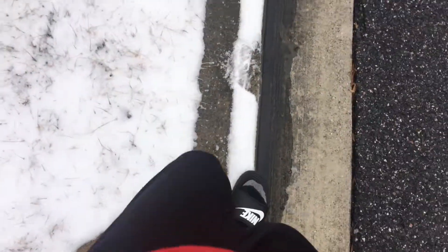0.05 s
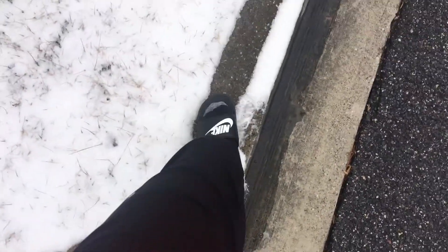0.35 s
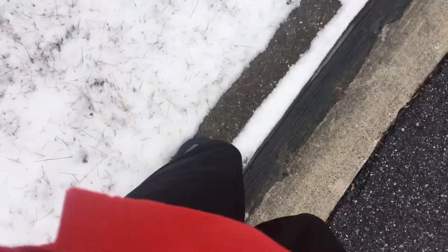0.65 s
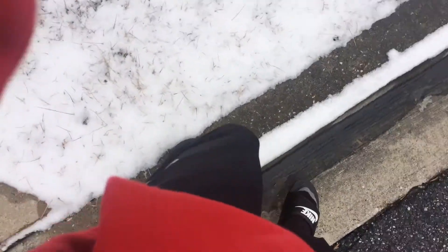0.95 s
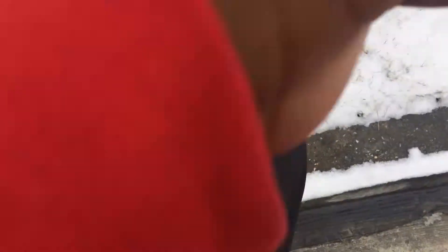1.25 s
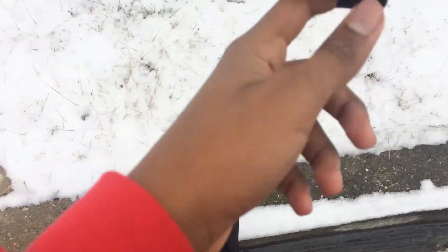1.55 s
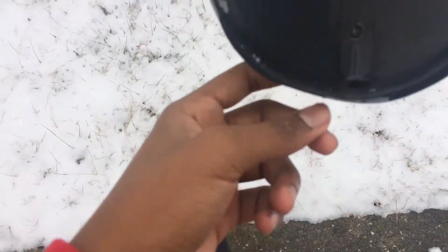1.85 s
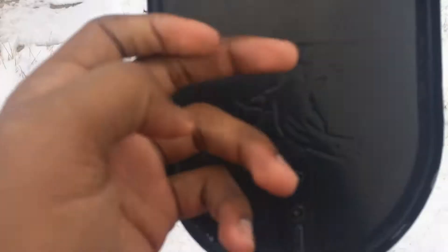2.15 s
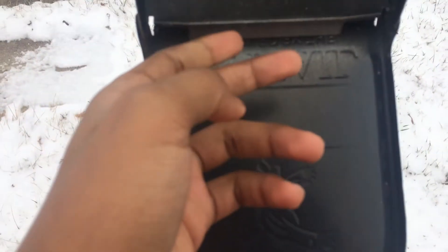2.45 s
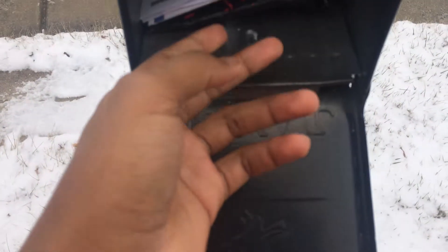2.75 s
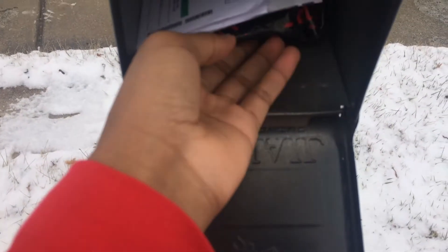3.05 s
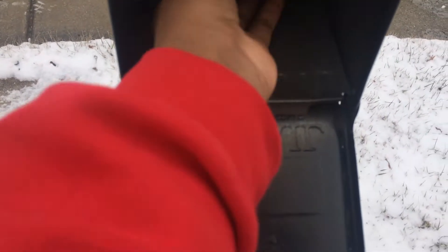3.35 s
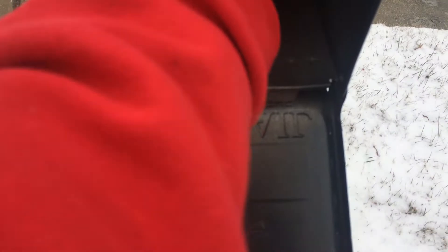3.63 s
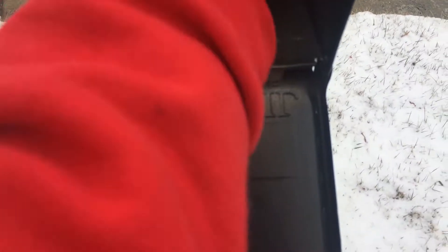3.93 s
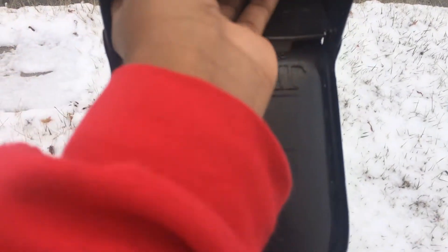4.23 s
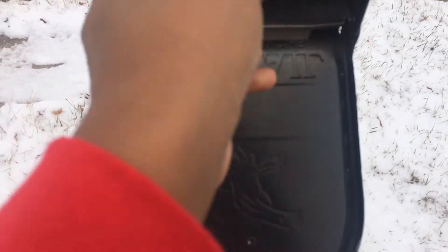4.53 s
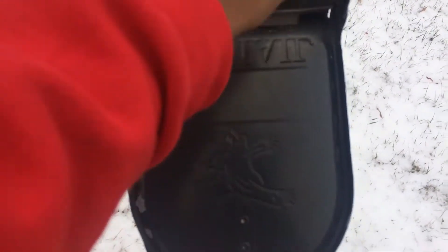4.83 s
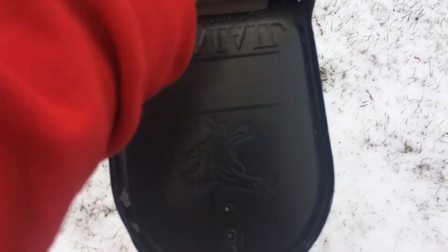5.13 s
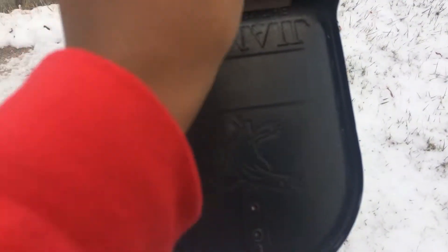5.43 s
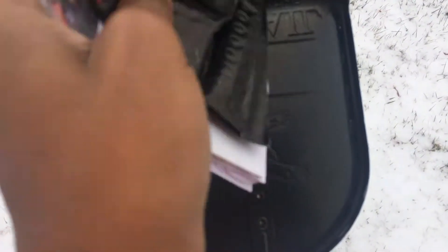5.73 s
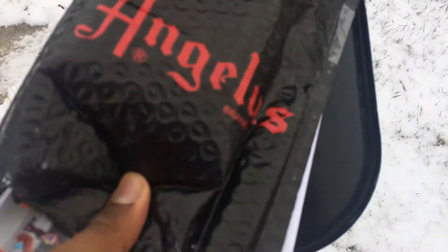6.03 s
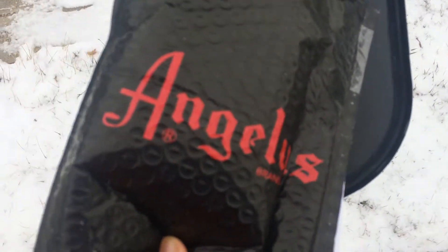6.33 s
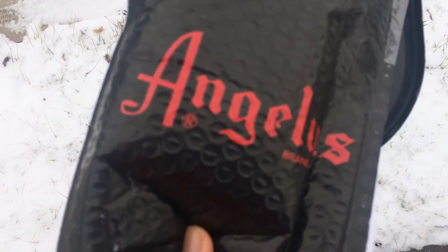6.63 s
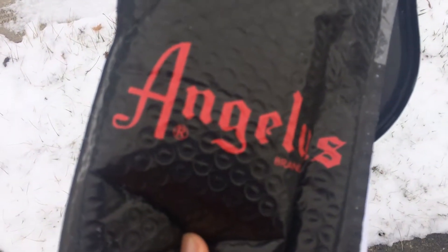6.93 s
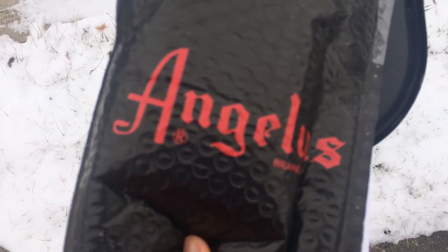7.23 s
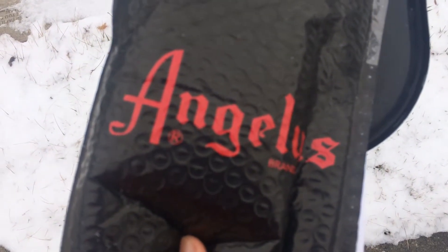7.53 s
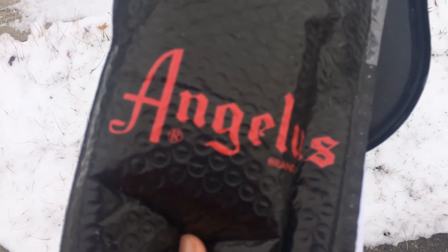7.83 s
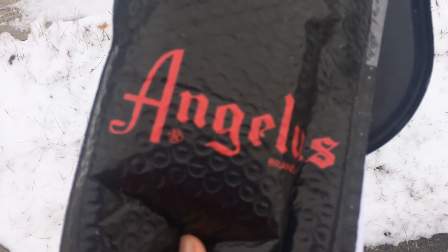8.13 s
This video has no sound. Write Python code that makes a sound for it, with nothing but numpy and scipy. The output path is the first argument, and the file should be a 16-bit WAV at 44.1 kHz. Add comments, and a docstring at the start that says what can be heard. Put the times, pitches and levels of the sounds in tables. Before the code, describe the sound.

Wind rumbles on the microphone as a plastic mailbox knocks and scrapes open, then a hand rummages and pulls out a crinkling mailer.

```python
"""At a plastic mailbox on a snowy curb, wind rumbles on a hand-held phone and two steps scuff up.
The box knocks and its door scrapes open. A hand rummages in short strokes, drags the mail over the
floor of the box with a thump, and pulls out a padded plastic mailer that crinkles ever less in the grip.
Scrapes and rustles are stick-slip friction, knocks are damped modes, snaps are bursts of noise.
Faint bird-like calls sound far off at the end."""
import sys
import numpy as np
from scipy import signal
from scipy.fft import rfft, irfft, next_fast_len
from scipy.io import wavfile
from scipy.ndimage import uniform_filter1d, map_coordinates

SR = 44100
rng = np.random.default_rng(int(sys.argv[2]) if len(sys.argv) > 2 else 0)


def bounce(signal):
    """Save signal as a 16-bit WAV file at the path given by the first command-line argument."""
    frames = np.transpose(np.atleast_2d(signal))
    limited = np.clip(frames, -1, 1)
    pcm = np.round(limited * 32767).astype(np.int16)
    wavfile.write(sys.argv[1], SR, pcm)


N = 365148


# hand strokes among the mail: t/s, length/s, film level/dB, wall level/dB, release t60/s
HAND_STROKES = [(3.008, 0.058, -46.5, -44, 0.26), (3.083, 0.074, -41, -49, 0.32),
                (3.171, 0.087, -41.5, -39, .25), (3.25, 0.076, -37, -36.5, 0.13),
                (3.344, 0.094, -40, -35.5, 0.24), (3.45, 0.2, -42.5, -55, 0.28),
                (3.657, 0.22, -45, -47.5, 0.33), (3.852, 0.17, -41, -40.5, .35),
                (3.995, 0.17, -33, -37.5, 0.45), (4.185, 0.03, -40, -62, .2),
                (4.252, 0.045, -35, -37.5, 0.21), (4.327, 0.076, -45, -45, .15),
                (4.409, 0.11, -39, -43.5, 0.17), (4.511, 0.035, -37.5, -39, 0.06),
                (4.547, 0.057, -52.5, -59, 0.36), (4.786, 0.064, -39.5, -44, 0.15),
                (4.845, 0.088, -37, -42.5, .2), (4.921, 0.12, -35, -42, 0.3),
                (5.043, 0.092, -36.5, -41.5, 0.22), (5.138, 0.053, -34, -36, 0.32),
                (5.218, 0.11, -37, -37, 0.31), (5.307, .11, -33, -41, 0.32),
                (5.435, 0.096, -37.5, -42, 0.16), (5.538, 0.17, -40.5, -50, .3),
                (5.676, 0.12, -36.5, -42.5, 0.49), (5.732, 0.053, -30, -35, 0.1),
                (5.861, 0.033, -37.5, -38.5, 0.2), (5.918, 0.018, -49, -42, 0.23),
                (5.97, 0.06, -45, -49, 0.19)]
# EQ of sliding film: f/Hz, level/dB
FILM_EQ = [(1060, -14), (1800, -5.5), (2190, -3.5), (2530, -8), (3030, -3), (3300, -2.5), (3800, -2),
           (5100, 1.5), (6900, 2), (10500, -15), (14400, -39), (15500, -95)]
# hollow of the box: f/Hz, width/Hz, level/dB
BOX_RESONANCES = [(826, 135, 6), (1017, 110, 4), (1210, 220, 0.5), (1453, 130, 2), (1670, 120, -4),
                  (1950, 280, -0.5), (2270, 310, -6.5), (3120, 910, -10.5)]

def rummage():
    """Plastic film slides, crackles and crinkles; where it rubs the walls, the box resonates."""
    releases = [row[-1] for row in HAND_STROKES]
    film_gain = strokes(HAND_STROKES, attack=.017, t60=releases)
    wall_gain = strokes(HAND_STROKES, attack=.017, t60=releases, column=1)
    crackle = slips(rate=4500, spread_db=3.6, clump_db=1.8, clump_rate=130)
    sliding = film_gain * unit(coloured(crackle, FILM_EQ))
    rub = crackle + slips(rate=1200, spread_db=2.5, clump_db=2, clump_rate=46)
    wall_eq = [(200, -44), (620, 7), (850, 14), (3000, 9.5), (7000, -3)]
    hollow = wall_gain * unit(coloured(resonate(rub, BOX_RESONANCES), wall_eq))
    rustle = shifting_folds(sliding + hollow + crinkles(), depth_db=1.9)
    return reflections(rustle, wet_db=-11.5, spread_s=.008)


# crinkle tails: t/s, length/s, level/dB
SETTLING = [(5.95, 0.4, -55.5), (6.5, 0.15, -60.5)]
# the mailer's creases, large to small: f/Hz, width/Hz, level/dB
CREASES = [(2230, 1200, 1), (4400, 1700, -3), (5600, 1000, -3), (6750, 800, -3), (9000, 2200, -8)]

def crinkles():
    """The mailer relaxes in the grip: creases of several sizes tick finely, each on its own."""
    ticks = sum(resonate(slips(rate=150, spread_db=3.2, clump_db=2.2, clump_rate=45), [crease])
                for crease in CREASES)
    ticks = coloured(ticks, [(600, -13), (1500, 0), (8000, 0), (11000, -14), (15000, -20)])
    return strokes(SETTLING, attack=.017, t60=.72) * unit(ticks)


# sharp plastic snaps: t/s, peak level/dB, t60/s, ring f/Hz
SNAPS = [(0.4863, -40, 0.028, 6240), (1.3503, -11.5, 0.024, 5870), (1.3536, -10.5, 0.043, 9100),
         (1.359, -16.5, 0.071, 6200), (1.507, -24, .02, 5800), (1.759, -12, 0.026, 7000),
         (3.013, -26, 0.022, 3240), (3.127, -22, .03, 4180), (3.486, -16.5, 0.017, 6200),
         (3.8485, -19.5, 0.026, 4760), (4.3297, -24, 0.033, 4800), (4.403, -12, 0.034, 4850),
         (4.448, -35, .02, 5000), (4.499, -23, 0.033, 5260), (4.532, -29, .025, 4000),
         (4.796, -22.5, 0.042, 5540), (4.8403, -14, 0.032, 5400), (4.8435, -8.5, 0.018, 5640),
         (4.852, -19, 0.039, 5600), (4.93, -24, .025, 6060), (4.944, -23, .02, 6200),
         (4.965, -32, .03, 6500), (5.038, -25, .02, 4960), (5.126, -27, .02, 3200),
         (5.147, -25, 0.025, 3800), (5.171, -23, 0.027, 4500), (5.192, -23, .02, 5000),
         (5.354, -20, 0.13, 3900), (5.414, -29, .02, 6000), (5.522, -26, 0.039, 5050),
         (5.557, -37, .02, 6000), (5.699, -23, .02, 6000), (5.766, -21, 0.046, 5500),
         (5.982, -27.5, 0.04, 8100), (6.13, -37, .03, 7070), (6.212, -36, .03, 7200),
         (6.2415, -46, .02, 5040), (6.2617, -37, 0.04, 5100), (6.2814, -38, .015, 3340),
         (6.294, -28.5, 0.022, 5900), (6.3437, -36, .02, 6870), (6.3622, -43, .02, 7130),
         (6.3906, -45, .025, 5350), (6.4295, -45, .02, 4600), (6.447, -43, .02, 4220),
         (6.464, -49, .02, 4800), (6.503, -46, .02, 5500), (6.507, -38, 0.02, 5490),
         (6.518, -35, 0.022, 8200), (6.53, -39, .02, 6440), (6.5572, -42, .02, 5020),
         (6.578, -37, 0.04, 7390), (6.586, -39, .03, 5200), (6.622, -37, 0.03, 5120),
         (6.6467, -41, 0.033, 5930), (6.66, -40, .02, 6200), (6.693, -45, .02, 2760),
         (6.709, -44, .02, 4900), (6.743, -46, .015, 5600), (6.753, -40.5, .022, 4490),
         (6.775, -39.5, 0.031, 5140), (6.8206, -50, .015, 5200), (6.867, -38.5, .028, 6600),
         (6.914, -48, .02, 5800), (6.934, -46, .02, 4800), (6.9514, -48, .015, 5000),
         (7.0244, -51, .02, 5500), (7.2504, -41.5, 0.02, 6400), (7.382, -52, .02, 5500),
         (7.996, -50.5, .02, 6000), (8.208, -48, 0.022, 5600)]
# their bright EQ: f/Hz, level/dB
SNAP_EQ = [(300, -26), (900, 1.5), (2200, -5), (4000, 1.5), (6300, 6.5), (8500, -0.5), (11000, -11.5),
           (15500, -26)]

def snaps():
    """Plastic snaps: the door's latch clicks, then the mailer's creases pop."""
    out = np.zeros(N)
    for s, db, t60, hz in SNAPS:
        pop = burst(t60, SNAP_EQ, crack_db=-1, crack_t60=.007)
        broad = np.interp(db, [-40, -14], [.6, 1.4])  # hard snaps are broad, small ticks more pitched
        pop = broad * pop + resonate(pop, [(hz, 1400, 1)])
        add(out, s, amp(db) * pop / np.abs(pop).max())
    return out


# flaps of the mail: t/s, peak level/dB, t60/s
FLAPS = [(3.778, -28, 0.04), (4.276, -22, 0.048), (4.289, -22, 0.06), (4.331, -20, 0.079),
         (4.402, -16, 0.098), (4.839, -22, .054), (4.931, -20, 0.038), (4.994, -20, 0.021),
         (5.168, -17, 0.055), (5.231, -28, 0.019), (5.877, -20, 0.11), (6.019, -25.5, 0.097),
         (6.062, -28, 0.02), (6.174, -29, 0.13), (6.226, -31.5, 0.025), (6.574, -34.5, 0.052)]
# their hollow EQ: f/Hz, level/dB
FLAP_EQ = [(200, -7), (650, -2), (980, 7), (1500, 2), (2000, 7), (2450, -3.5), (3000, -0.5), (4200, -11),
           (8000, -31), (15000, -56)]

def flaps():
    """The padded sheet and the letters flip over the rim of the box."""
    out = np.zeros(N)
    for s, db, t60 in FLAPS:
        crack_db = np.interp(db, [-22, -10], [2, 11])  # harder flaps crack more sharply
        add(out, s, amp(db) * burst(t60, FLAP_EQ, crack_db, crack_t60=.006))
    return out


# pulls over the floor of the box: t/s, length/s, level/dB
PULLS = [(3.67, 0.11, -50), (3.845, .04, -36.5), (3.882, 0.056, -26.5), (3.935, 0.062, -27),
         (3.972, 0.15, -24)]
# their tone deep in the box and at its mouth: f/Hz, width/Hz, level/dB
DEEP_RESONANCES = [(1072, 75, 7.5), (1300, 67, -2), (1900, 360, -13)]
MOUTH_RESONANCES = [(1020, 93, -2), (1470, 150, 5.5), (1840, 330, -5), (3150, 140, -12), (4070, 520, -11),
                    (5050, 450, -19)]
# catches before the slide: t/s, level/dB
CATCHES = [(3.603, -33), (3.688, -26), (3.712, -35), (3.733, -31), (3.754, -34), (3.778, -22), (3.797, -30)]
# the back of the box answers each: f/Hz, level/dB, t60/s
CATCH_MODES = [(1080, 0, 0.03), (1230, -12, .03), (1950, -19, .02)]

def drag(slide_start_s=3.915, slide_s=.053):
    """The bundle catches, then rasps along the box in jerks; its hollow note rises near the mouth."""
    near = curve([(slide_start_s, 0), (slide_start_s + slide_s, .95)])
    judder = slips(rate=1500, spread_db=1, clump_db=1.4, clump_rate=110)
    deep = np.sqrt(1 - near) * unit(resonate(judder, DEEP_RESONANCES))
    mouth = np.sqrt(near) * unit(resonate(judder, MOUTH_RESONANCES))
    rasp = unit(coloured(deep + mouth, [(400, -26), (900, 8), (5000, 5), (11000, -18)]))
    return strokes(PULLS, attack=.01, t60=.073) * rasp + struck(CATCHES, CATCH_MODES, attack=.0012)


# how hard the door rubs its frame: t/s, level/dB
DOOR_RUB = [(1.42, -50), (1.5, -34.5), (1.66, -33.5), (1.77, -31), (1.86, -30.5), (1.925, -38), (2.02, -69)]
# EQ of the rub: f/Hz, level/dB
DOOR_EQ = [(410, -53), (700, -6), (919, -14), (1130, -29), (1450, -7), (1950, -3.5), (3100, -11.5),
           (3490, -13), (4520, -16.5), (4950, -6), (5710, 1.5), (6410, 2), (9840, -16), (12300, -17),
           (15500, -69.5)]
# squeal as it starts, squeal as it swings wide, and the rubbed panel: f/Hz, width/Hz, level/dB
TIGHT_SQUEAL = [(4500, 650, 12.5), (5500, 210, -11), (7700, 830, 4)]
WIDE_SQUEAL = [(5070, 130, 14), (5470, 90, 11), (5680, 130, 12), (6380, 260, 23.5), (6670, 100, 20),
               (6900, 110, 19), (7240, 370, 16), (8400, 1700, 4)]
PANEL_RESONANCES = [(1470, 110, 0), (1620, 120, 1), (1737, 81, 3)]
# the door comes free: t/s, level/dB
DOOR_RELEASES = [(1.918, -35)]
# the panel's ring-out: f/Hz, level/dB, t60/s
PANEL_MODES = [(1390, -11, 0.43), (1620, -5, .1), (1670, 5, 0.18), (1754, -11.5, 0.68)]

def door():
    """The door hisses along its frame, rising in pitch as it swings; the panel rings once free."""
    rub = amp(curve(DOOR_RUB, outside=-120)) * slips(rate=14000, spread_db=3, clump_db=1, clump_rate=200)
    swing = curve([(1.52, 0), (1.78, 1)])
    hiss = coloured(rub, DOOR_EQ)
    squeal = resonate(rub * (1 - swing), TIGHT_SQUEAL) + resonate(rub * swing, WIDE_SQUEAL)
    panel = resonate(resonate(rub, PANEL_RESONANCES), PANEL_RESONANCES)
    scrape = amp(-4) * unit(hiss) + amp(2) * unit(squeal) + amp(-14) * unit(panel)
    scrape = coloured(scrape, [(8000, 2), (12000, -2), (13500, -19), (15500, -26)])
    scrape = np.std(rub) * shifting_folds(scrape, depth_db=1)
    return scrape + struck(DOOR_RELEASES, PANEL_MODES, attack=.0032)


# a dry knock, and the mail thumping the shell: t/s, level/dB
KNOCKS = [(1.139, -4.5)]
THUMPS = [(4.121, -16), (4.138, -11), (4.8, -25), (4.83, -24)]
# the ring of each: f/Hz, level/dB, t60/s
KNOCK_MODES = [(595, -8, 0.014), (780, 2.5, 0.009), (1485, 11, 0.0056), (1840, -4, 0.0046),
               (2470, -36, .008)]
SHELL_MODES = [(166.5, 0.5, 0.16), (191.7, 1.5, 0.22), (246, -8.5, 0.35), (368, -19, 0.078),
               (456, -16.5, 0.47), (501, -15, 0.29), (770, -11, 0.089)]

def box_knocks():
    """The box knocks dryly, and its shell booms when the mail bumps it."""
    return struck(KNOCKS, KNOCK_MODES, attack=.0011) + struck(THUMPS, SHELL_MODES, attack=.0012)


# the door jolts on its hinge, the mail jolts the box: t/s, peak level/dB, t60/s
JOLTS = [(1.354, -24, 0.26), (1.529, -23.5, 0.15), (1.758, -21.5, 0.065), (1.772, -19.5, 0.055),
         (1.862, -23, 0.068), (4.12, -11, 0.12), (3.404, -25, 0.068), (4.831, -24.5, 0.13),
         (5.742, -23.5, 0.075), (5.784, -25, 0.045)]
# their dull EQ: f/Hz, level/dB
JOLT_EQ = [(100, -7), (250, 3.5), (500, 4), (850, -11), (1600, -7.5), (3000, -18), (8000, -18),
           (15000, -70)]

def jolts():
    """The plastic shell shudders and quickly damps."""
    out = np.zeros(N)
    for s, db, t60 in JOLTS:
        add(out, s, amp(db) * burst(t60, JOLT_EQ, crack_db=-11, crack_t60=.0086))
    return out


# soft taps inside, and a crack on the rim: t/s, level/dB
TAPS = [(4.645, -33.5), (4.799, -31), (4.831, -25), (4.843, -34), (4.914, -26), (5.056, -38),
        (5.186, -25.5), (5.232, -22)]
RIM_CRACKS = [(5.7847, -1)]
# the ring of each: f/Hz, level/dB, t60/s
TAP_MODES = [(844, -1.5, 0.055), (947, -6, 0.054), (1090, -11, 0.055), (1920, -23, .05)]
RIM_MODES = [(950, -24.5, 0.06), (1460, -20, 0.014), (1760, 0, 0.003), (1990, -16.5, 0.028),
             (2690, -14, 0.015)]

def mail_taps():
    """The mail taps the hollow box, and the bundle's edge cracks against the rim."""
    return struck(TAPS, TAP_MODES, attack=.0013) + struck(RIM_CRACKS, RIM_MODES, attack=.00017)


# a late click: t/s, level/dB
CLICKS = [(7.764, -41)]
# its ring: f/Hz, level/dB, t60/s
CLICK_MODES = [(2520, -2, .025), (4120, -2, 0.026), (4680, 1, 0.02), (5200, -3, .02)]

def click():
    """A small hard click rings high and short."""
    return struck(CLICKS, CLICK_MODES, attack=.00068)


# sleeve moves: t/s, length/s, level/dB
SLEEVE_SLIDES = [(2.66, 0.54, -48.5), (3.4, 0.2, -44)]
# cloth EQ: f/Hz, level/dB
SLEEVE_EQ = [(800, -4.5), (2600, -8), (4000, -14), (5000, -3), (6400, -3), (8500, -8), (10500, -15),
             (13500, -19), (14500, -38)]

def sleeve():
    """A sleeve slides with a soft hiss as the arm reaches in."""
    return strokes(SLEEVE_SLIDES, attack=.21, t60=.44) * unit(coloured(noise(), SLEEVE_EQ))


# shoe scuffs, and swishes as leg and arm swing forward: t/s, length/s, level/dB
SCUFFS = [(.352, 0.1, -45), (.418, 0.02, -40.5), (.483, 0.035, -51.5), (.57, 0.065, -58),
          (.895, 0.069, -54), (.945, 0.023, -47), (1.04, 0.073, -47.5), (1.105, 0.057, -42.5)]
SWISHES = [(.9, 0.31, -50), (1.22, 0.16, -43.5)]
# EQ of each: f/Hz, level/dB
SOLE_EQ = [(300, -22), (800, 2), (1300, -2.5), (2300, -6.5), (4000, -11), (6500, -9), (9000, -21),
           (11500, -45), (15500, -50)]
SWISH_EQ = [(600, 1), (2500, -3.5), (4000, -4), (6000, -3), (8700, -4.5), (10200, -14), (12500, -27)]

def steps():
    """Soles grind grit against the pavement while the clothes swish."""
    grit = slips(rate=3000, spread_db=3, clump_db=2.5, clump_rate=120)
    soles = strokes(SCUFFS, attack=.0052, t60=.052) * unit(coloured(grit, SOLE_EQ))
    weave = slips(rate=8100, spread_db=-3, clump_db=1, clump_rate=57)
    clothes = strokes(SWISHES, attack=.13, t60=.4) * unit(coloured(weave, SWISH_EQ))
    return soles + clothes


# air shoves the microphone port as the phone swings: t/s, length/s, level/dB
SHOVES = [(.86, 0.099, -16.5), (1.15, 0.17, -12.5), (3.2, 0.25, -7), (3.45, 0.22, -12.5),
          (4.08, 0.2, -17.5), (4.9, 0.72, -28)]
# fader ride of the buffeting: t/s, level/dB
BUFFET_RIDE = [(0, -24.5), (.7, -28), (1.05, -29), (1.25, -23.5), (1.8, -22.5), (2.3, -27.5), (2.7, -29),
               (3.25, -24), (3.45, -19.5), (3.75, -21), (3.95, -27), (4.35, -30.5), (5.0, -29),
               (5.7, -30.5), (6.15, -30.5), (6.35, -27.5), (7.2, -27), (7.8, -29)]
# EQ of the three low layers: f/Hz, level/dB
SWELL_EQ = [(2, -84), (6, 5), (13, 2), (25, -19.5), (45, -29), (120, -69), (400, -120)]
BUFFET_EQ = [(12, -14.5), (30, -13.5), (62, 4), (115, 0.5), (170, -6), (260, -39.5), (500, -53),
             (1200, -120)]
ROLL_EQ = [(12, -15), (25, -2.5), (50, 3.5), (75, -11), (150, -37), (400, -104)]

def wind_rumble(ceiling=.85):
    """Wind buffets the port in lumps over a deep roll and slow swells; strong pushes saturate softly."""
    shoves = strokes(SHOVES, attack=.068, t60=.36)
    swell = (amp(-26.5) + shoves) * unit(coloured(noise(), SWELL_EQ, size=32768))
    buffet = amp(curve(BUFFET_RIDE)) * unit(coloured(noise(), BUFFET_EQ))
    roll = (amp(-28.5) + amp(-18) * shoves) * unit(coloured(noise(), ROLL_EQ))
    lumps = (buffet + roll) * unit(amp(.89 * wobble(14)))
    return ceiling * np.tanh((swell + lumps) / ceiling)


# fader rides of the wind's rush and the open air's hiss: t/s, level/dB
RUSH_RIDE = [(0, -32), (.4, -36), (1.02, -36), (1.2, -32.5), (1.6, -34), (2.05, -37.5), (2.6, -39),
             (3.1, -37), (3.35, -34), (3.78, -30.5), (4.0, -37.5), (4.5, -37), (4.9, -38.5), (5.6, -41),
             (6.2, -40.5), (6.9, -39), (7.3, -41), (8.28, -39.5)]
AIR_RIDE = [(0, -51), (.8, -57.5), (2.2, -55), (6.5, -55), (7.4, -59.5), (8.28, -59)]
# EQ of each: f/Hz, level/dB
RUSH_EQ = [(80, -20.5), (200, 1), (340, -1), (480, -6), (650, -16.5), (1000, -26.5), (1600, -42),
           (3000, -43), (9000, -64)]
AIR_EQ = [(200, 10.5), (1000, 8), (2000, -4.5), (3500, -10.5), (5500, -4), (7500, -7.5), (10000, -14.5),
          (15000, -20.5)]
# humming gusts: t/s, length/s, level/dB, release t60/s
GUSTS = [(0, 0.21, -31, 1.2), (0.154, 0.21, -24.5, 0.99), (0.446, 0.26, -36.5, 1.5),
         (6.676, 0.29, -36.5, 1), (7.518, 0.18, -39, 0.87), (8.015, 0.23, -36, 1.2)]
# the port's note: f/Hz, width/Hz, level/dB
PORT_RESONANCE = [(339, 88, 0)]

def wind_rush():
    """Wind rushes past, gusts hum across the port, and the open air hisses."""
    rush = amp(curve(RUSH_RIDE)) * unit(coloured(noise() * amp(1.06 * wobble(25)), RUSH_EQ))
    port_note = unit(resonate(resonate(noise(), PORT_RESONANCE), PORT_RESONANCE))
    hum = strokes(GUSTS, attack=.22, t60=[row[-1] for row in GUSTS]) * port_note
    air = amp(curve(AIR_RIDE)) * unit(coloured(noise(), AIR_EQ))
    return rush + hum + air


# far-off calls, like a bird's: t/s, level/dB, f/Hz, width/Hz, length/s
FAR_CALLS = [(7.497, -63, 3020, 600, 0.069), (7.66, -57, 2500, 110, 0.045), (7.786, -65, 2520, 60, 0.054),
             (7.936, -69, 2500, 60, .07)]
# the rustle behind them: t/s, length/s, level/dB
FAR_RUSTLE = [(7.5, .8, -60.5)]

def distant_calls():
    """Thin calls, smeared by the way they travel, over a faint rustle."""
    rustle_eq = [(500, -26), (1300, 3), (2400, -6), (3300, -13), (8000, -41)]
    out = strokes(FAR_RUSTLE, attack=.46, t60=.5) * unit(coloured(noise(), rustle_eq))
    t = np.arange(SR // 2) / SR
    for s, db, hz, width, length in FAR_CALLS:
        band = [(hz, width, 0)]
        tone = unit(resonate(resonate(rng.standard_normal(len(t)), band), band))
        envelope = 7 * t / length * np.exp(-3 * t / length)
        add(out, s, amp(db) * envelope * tone)
    return out


def slips(rate, spread_db, clump_db, clump_rate):
    """Stick-slip friction: tiny uneven impulses, rate a second, swelling in clumps; rms 1."""
    at = np.flatnonzero(rng.random(N) < rate / SR)
    size = amp(spread_db * np.minimum(rng.standard_exponential(N)[at], 4))
    polarity = np.sign(rng.random(N)[at] - .5)
    out = np.zeros(N)
    out[at] = size * polarity * amp(clump_db * wobble(clump_rate)[at])
    return unit(out)


def struck(blows, modes, attack):
    """Each blow rings the same damped modes in a slightly different balance."""
    out, t = np.zeros(N), np.arange(SR // 2) / SR
    for s, db in blows:
        ring = sum(amp(level + rng.normal() - 60 * t / t60) * np.sin(2 * np.pi * hz * t)
                   for hz, level, t60 in modes)
        add(out, s, amp(db) * ring * (1 - np.exp(-t / attack)))
    return out


def burst(t60, eq, crack_db, crack_t60):
    """A sheet buckles: a hard crack and a short flutter, peak 1."""
    t = np.arange(SR // 4) / SR
    fade = amp(-60 * t / t60) + amp(crack_db - 60 * t / crack_t60)
    x = coloured(rng.standard_normal(len(t)) * fade, eq)
    return x / np.abs(x).max()


def reflections(x, wet_db, spread_s, size=12000):
    """Close reflections from the box and the hand comb the sound, and change as the hand moves."""
    out = np.zeros(N)
    for first in range(0, N - size, size // 2):
        echo = np.zeros(SR // 20)
        echo[0] = 1
        for delay, strength in rng.random((8, 2)):
            add(echo, .0008 + delay * spread_s, [amp(wet_db) * (2 * strength - 1)])
        grain = x[first:first + size] * np.hanning(size)
        add(out, first / SR, signal.fftconvolve(grain, echo / np.linalg.norm(echo)))
    return out


def shifting_folds(x, depth_db, bins=14, frames=22):
    """The colour drifts in patches of time and frequency, as when folds open and close."""
    spectrum = signal.stft(x, nperseg=512)[2]
    drift = rng.standard_normal(spectrum.shape)
    drift = uniform_filter1d(uniform_filter1d(drift, bins, 0), frames, 1)
    return signal.istft(spectrum * amp(depth_db * unit(drift)), nperseg=512)[1][:N]


def strokes(rows, attack, t60, column=0):
    """Gain of (t/s, length/s, level/dB, ..) gestures: each rises, holds, then dies away over its t60."""
    t, power = np.arange(N) / SR, np.zeros(N)
    for (s, length, *db), release in zip(rows, np.broadcast_to(t60, len(rows))):
        first = round(s * SR)
        age = t[first:first + int((length + 1.5 * release) * SR)] - s
        shape = np.clip(age / attack, 0, 1) * amp(-60 * np.maximum(age - length, 0) / release)
        power[first:first + len(age)] += (amp(db[column]) * shape) ** 2
    return np.sqrt(power)


def curve(rows, outside=None):
    """One value per sample from (t/s, value) rows; the ends hold unless an outside value is given."""
    s, value = np.transpose(rows)
    return np.interp(np.arange(N) / SR, s, value, left=outside, right=outside)


def coloured(x, points, size=8192):
    """Minimum-phase EQ through (f/Hz, level/dB) points."""
    f, db = np.transpose(points)
    gain = amp(np.interp(np.log(np.fft.rfftfreq(size, 1 / SR) + 1), np.log(f), db))
    cepstrum = irfft(np.log(gain + 1e-6))
    cepstrum[1:size // 2] *= 2
    cepstrum[size // 2 + 1:] = 0
    fade = np.hanning(2 * size)[size:]
    return signal.oaconvolve(x, irfft(np.exp(rfft(cepstrum))) * fade)[:len(x)]


def resonate(x, modes, size=4096):
    """x through parallel (f/Hz, width/Hz, level/dB) resonances."""
    f = np.fft.rfftfreq(size, 1 / SR)
    response = sum(amp(db) * 1j * f * width / (hz * hz - f * f + 1j * f * width)
                   for hz, width, db in modes)
    return signal.oaconvolve(x, irfft(response)[:size // 2])[:len(x)]


def wobble(rate):
    """A smooth random curve, rate knots a second."""
    knots = rng.standard_normal(int(N * rate / SR) + 4)
    coarse = np.linspace(0, N, N // 32)
    return np.interp(np.arange(N), coarse, map_coordinates(knots, [coarse * rate / SR]))


def noise():
    """White noise for the whole scene."""
    return rng.standard_normal(N)


def amp(db):
    """Decibels to gain."""
    return np.exp(np.asarray(db) * (np.log(10) / 20))


def unit(x):
    """Scale to rms 1."""
    return x / np.sqrt(np.mean(x ** 2) + 1e-20)


def add(track, s, sound):
    """Mix a sound into the track at time s."""
    part = track[round(s * SR):][:len(sound)]
    part += sound[:len(part)]


def scene():
    """Mono mix in the open: close hits and handling over a bed of wind and distant calls."""
    hits = box_knocks() + jolts() + mail_taps() + click()
    bed = wind_rumble() + wind_rush() + distant_calls()
    foley = steps() + door() + rummage() + sleeve() + drag() + snaps() + flaps()
    return (hits + foley + bed)[None]


def record(dry, top_hz=15700):
    """The phone keeps nothing above its band limit."""
    size = next_fast_len(N + SR // 4)
    passband = np.fft.rfftfreq(size, 1 / SR) < top_hz
    return irfft(rfft(dry, size) * passband, size)[:, :N]


dry = scene()
out = record(dry)
bounce(out)
```